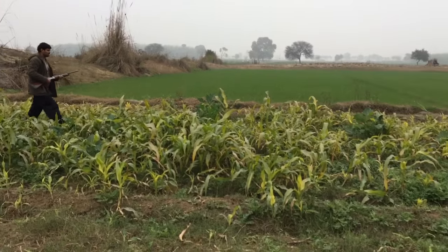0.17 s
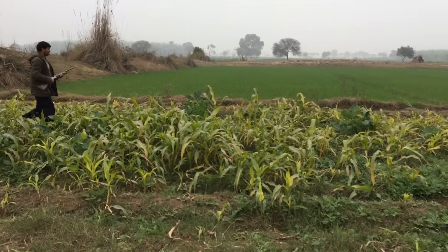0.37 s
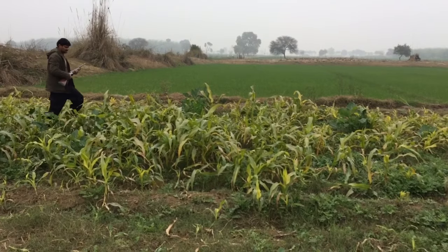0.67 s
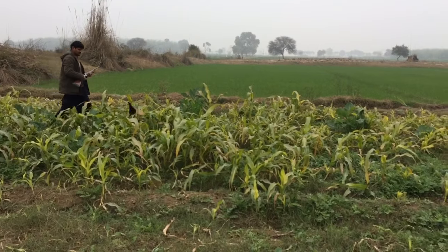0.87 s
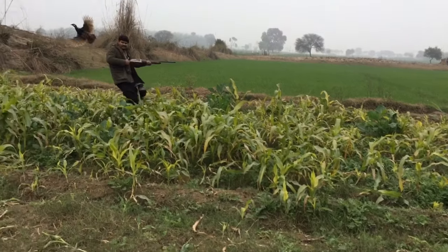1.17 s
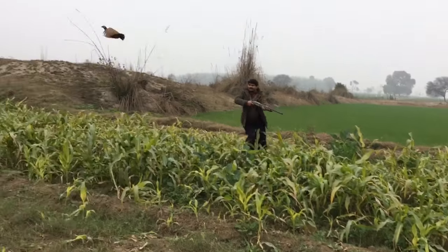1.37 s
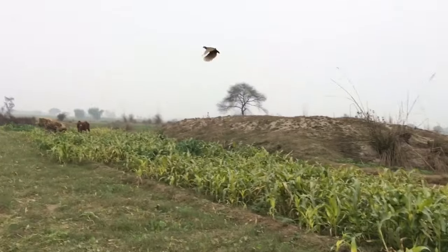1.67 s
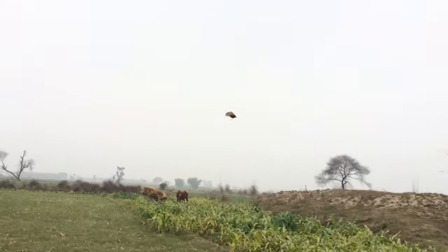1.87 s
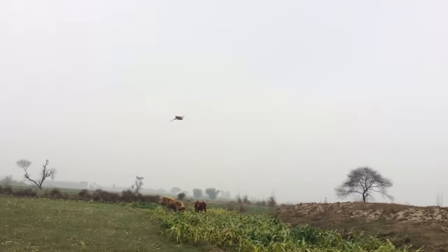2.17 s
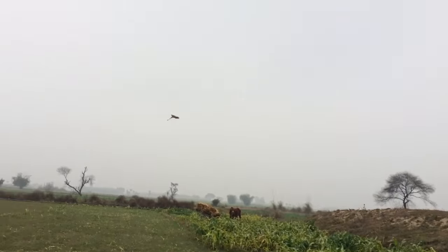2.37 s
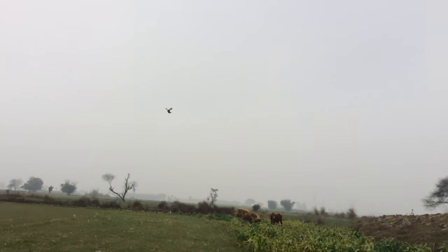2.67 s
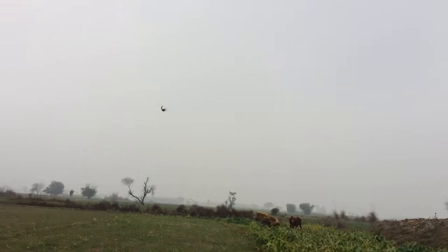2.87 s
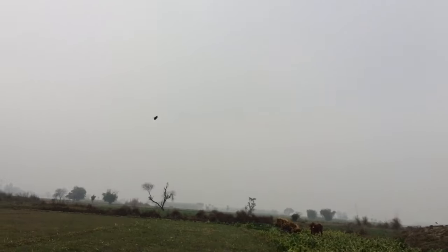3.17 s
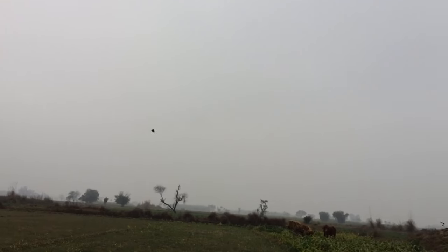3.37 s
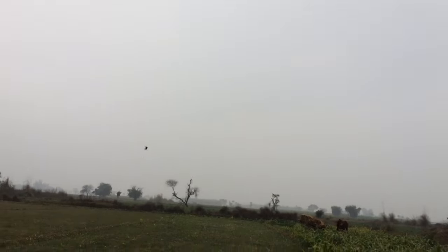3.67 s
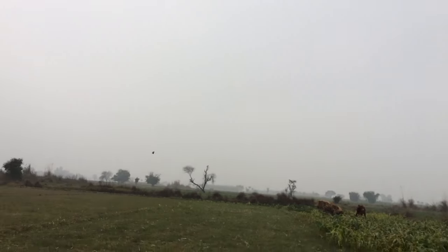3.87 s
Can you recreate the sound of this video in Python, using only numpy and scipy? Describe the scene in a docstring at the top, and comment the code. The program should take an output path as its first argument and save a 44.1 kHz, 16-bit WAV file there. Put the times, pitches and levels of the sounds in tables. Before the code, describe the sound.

A shotgun blast cracks across open farmland near the end, with thumping echoes. Before it, quiet steps and rustling leaves, then a flushed bird's rapid wingbeats fade away; one outdoor handheld microphone, mono.

```python
"""Game bird and shotgun blast

A walker in a leafy crop flushes a game bird: wingbeats are short hollow tones mixed with noise.
One shotgun blast follows: a sharp pressure pulse, noise scattered by the plants, and low thumping echoes.
Steps, scuffs and snapping stalks are short noise bursts, and the leaves rustle as noise with tiny ticks.
Behind them lie low wind, a faint hiss of air and a hoarse far bird call.
"""
import sys
import numpy as np
from scipy.fft import rfft, irfft, next_fast_len
from scipy.io import wavfile
from scipy.ndimage import map_coordinates

SR = 44100
rng = np.random.default_rng(int(sys.argv[2]) if len(sys.argv) > 2 else 0)


def wrap_up_sound(samples):
    """Save the sound to the file named by the first command line argument, as 16-bit audio."""
    columns = np.atleast_2d(samples).T
    # keep every value between -1 and 1, then stretch to whole-number steps
    tamed = np.clip(columns, -1, 1)
    steps = np.round(tamed * 32767).astype(np.int16)
    wavfile.write(sys.argv[1], SR, steps)


N = 176400  # samples: 4 seconds

# Edges of the bands in which the blast dies away: edge_hz
BAND_EDGES = [90, 600, 2100, 5000, 16000]
# Tone colour of the scattered blast: frequency_hz, level_db
BLAST_COLOUR = [(59, -53), (100, -30.5), (166, -1), (248, -8), (275, -5.5), (355, -9.5), (438, 4.5),
                (564, -6), (682, -6), (861, -9.5), (1110, -9), (1210, -7.5), (1880, -9), (2270, -12.5),
                (2630, -10), (4960, -15.5), (5630, -15), (14500, -23.5), (15500, -34.5)]
# Fading of the scatter, one row per band:
# level_db, attack_s, hold_s, decay_db_per_s, tail_level_db, tail_decay_db_per_s
SCATTER_BANDS = [(-21, .002, 0.034, 85, -58.5, 35), (-12.5, 0.0011, 0.023, 200.5, -51, 48.5),
                 (-16, .001, 0.011, 205.5, -53, 48), (-15.5, 0.0003, 0.016, 201, -58.5, 45)]
# Tone colour of the swell ahead of the crack: frequency_hz, level_db
LEAD_COLOUR = [(15, -44), (25, 1), (129, -10), (431, -6.5), (1190, -21), (1550, -9), (2280, -30),
               (2900, -4), (3700, -45.5), (8000, -49.5), (10400, -66), (17600, -120)]
# Sine tones layered under the blast: pitch_hz, level_db (before BLAST_TONES_DB)
BLAST_TONES = [(446.8, -29.5), (667.5, -35), (748.3, -34), (909.8, -34.5), (1130, -36.5), (1287, -33.5),
               (1378, -34), (1540, -36), (1750, -32.5), (1820, -33), (1873, -37.5)]
# Echoes off banks and tree lines: start_s, level_db, rise_s, pitch_hz
ECHO_THUMPS = [(3.006, -19.5, .005, 210), (3.037, -20, 0.0025, 350), (3.069, -22.5, 0.005, 414),
               (3.078, -19.5, 0.0043, 315), (3.13, -27.5, 0.0045, 198), (3.175, -20, 0.0071, 188),
               (3.217, -26.5, 0.0073, 190), (3.231, -31, 0.0055, 368), (3.283, -28.5, 0.0044, 267),
               (3.372, -28.5, .007, 195), (3.546, -25, 0.0046, 172), (3.626, -33.5, .005, 154),
               (3.904, -35, 0.0052, 166), (3.923, -33.5, 0.0081, 134)]
# Tone colour of the low roll: frequency_hz, level_db
ROLL_COLOUR = [(29, -58), (50, -38.5), (135, 0), (184, 6), (300, -3), (443, -10.5), (534, -39.5),
               (621, -22), (1000, -37), (1300, -73), (2200, -120), (2000, -45), (5000, -90)]
# Wingbeats: start_s, level_db (before BEAT_DB or PUSH_DB), pitch_hz (at the peak), rise_s
WINGBEATS = [(0.922, -38, 720, 0.005), (0.982, -33, 690, 0.0057), (1.045, -26.5, 600, 0.0023),
             (1.101, -31, 677, 0.0041), (1.158, -31, 657, 0.003), (1.219, -27, 592, 0.003),
             (1.276, -38.5, 827, 0.0049), (1.335, -31.5, 550, 0.0038), (1.399, -29, 700, 0.0037),
             (1.459, -40, 674, 0.0044), (1.525, -45, 605, 0.0042), (1.626, -46, 583, 0.0047),
             (1.715, -44, 538, 0.0038), (1.778, -47, 594, 0.0042), (1.842, -51, 820, 0.0039),
             (1.907, -46, 604, 0.0042), (1.971, -50, 560, 0.0036), (2.305, -55.5, 636, 0.0048),
             (2.373, -50.5, 619, 0.0029), (2.442, -57, 651, 0.0042)]
# Scuffs in the plants: peak_s, level_db, half_length_s, centre_hz, upper_edge_hz
SCUFFS = [(0.612, -52, 0.011, 2550, 12000), (0.884, -47.5, 0.013, 2970, 14000),
          (0.958, -40, 0.017, 1800, 12000), (1.025, -37, 0.0037, 1590, 12200),
          (1.041, -43, 0.0063, 1260, 6000), (1.258, -44, 0.01, 1400, 12000),
          (1.352, -46, .012, 1490, 12000), (1.402, -46, 0.021, 1800, 12000),
          (3.224, -51, 0.033, 5200, 9000), (3.312, -49.5, .015, 3200, 8100),
          (3.371, -38.5, 0.014, 2970, 7600), (3.405, -35, 0.012, 2630, 7400),
          (3.452, -49, 0.023, 2380, 6800), (3.502, -46.5, 0.0085, 2600, 6850),
          (3.593, -42.5, 0.011, 1540, 4540), (3.791, -48.5, 0.0059, 1720, 5400),
          (3.889, -58, 0.0062, 1970, 5000), (3.922, -57.5, 0.016, 1810, 4850),
          (3.965, -58, 0.017, 1630, 4430)]
# Snapping stalks and dry clicks: start_s, level_db, decay_s, centre_hz, width (over centre), upper_edge_hz
SNAPS = [(0.315, -38.5, 0.0024, 2050, 0.27, 12000), (0.675, -43, 0.0052, 1800, 0.56, 6000),
         (0.876, -53, 0.0035, 3000, 2, 14000), (1.134, -39, 0.0025, 8900, 0.96, 15000),
         (1.194, -38.5, .007, 1990, 0.37, 9000), (1.2347, -26, 0.0036, 1790, 0.37, 14000),
         (1.333, -34.5, 0.0066, 1210, .6, 6000), (1.649, -37, 0.0043, 2330, 0.61, 4960),
         (3.1086, -22, 0.0013, 2380, 0.1, 14500), (3.393, -26, 0.0027, 1540, 0.93, 5000),
         (3.408, -30, 0.0052, 1710, 0.31, 5000), (3.498, -37, .003, 2400, 0.5, 7000),
         (3.626, -41, 0.0038, 3600, 0.54, 7040), (3.779, -41, 0.0052, 1770, 0.29, 4960),
         (3.926, -49, 0.0062, 1890, 0.22, 4000), (3.959, -48, .005, 1270, 0.46, 3000)]
# Soft footfalls: start_s, level_db
FOOTFALLS = [(0.611, -40.5), (0.934, -36.5), (1.039, -35), (1.234, -30), (1.386, -41.5), (3.389, -29.5)]
# Tone colour of a footfall: frequency_hz, level_db
FOOT_COLOUR = [(25, 4), (60, -12), (160, 9.5), (300, -9), (700, -13.5), (3000, -49)]
# Rise and fall of the rustling leaves: time_s, level_db (before RUSTLE_DB)
RUSTLE_LEVEL = [(0.0, -57), (0.06, -53), (0.12, -65.5), (0.31, -61), (0.55, -66.5), (0.62, -58.5),
                (0.8, -60), (0.86, -61), (0.88, -45), (0.93, -55), (0.95, -48.5), (1.1, -54), (1.23, -50.5),
                (1.23, -37.5), (1.27, -49), (1.31, -54.5), (1.35, -43), (1.5, -56.5), (1.58, -53),
                (1.6, -56), (1.95, -57.5), (2.05, -66.5), (2.68, -78.5), (2.78, -70.5), (2.79, -82),
                (2.86, -72)]
# Tone colour of the leaves: frequency_hz, level_db
LEAF_COLOUR = [(180, -42.5), (300, -6), (500, -8), (696, -6), (835, -8), (1910, -7), (2790, -11),
               (3510, -8.5), (4570, -11), (14500, -20), (15500, -28.5)]
# Far calls: peak_s, level_db, half_length_s
FAR_CALLS = [(0.51, -60, 0.1), (2.34, -69.5, .10), (3.713, -60.5, 0.083)]
# Rise and fall of the wind: time_s, level_db (before WIND_DB)
WIND_LEVEL = [(0, -51), (.7, -48), (1.25, -45), (1.45, -53), (2.1, -51.5), (2.4, -49), (2.85, -51),
              (4, -48.5)]
# Tone colour of the wind: frequency_hz, level_db
WIND_COLOUR = [(15, -43), (25, -30), (59, -1.5), (75, 0), (132, -9.5), (238, -27), (266, -23.5),
               (350, -30.5), (460, -58), (770, -120), (900, -64)]
# Tone colour of the hiss of air: frequency_hz, level_db
AIR_COLOUR = [(120, -26), (200, 2), (315, -30.5), (352, -6.5), (392, -8.5), (430, -6.5), (812, -12.5),
              (4750, -20.5), (15500, -32.5)]

SHOT_S = 2.9063  # moment of the crack
LEAD_S, LEAD_DB, LEAD_HISS_DB = 0.023, -22.5, -38.5  # start before the crack, swell level, hiss level
SHOCK_DB, SHOCK_S = 5.5, 0.00066  # level; time until the pressure crosses zero
THUD_DB, THUD_HZ, THUD_RISE_S = -25.5, 57.4, 0.0023  # the low push of the muzzle gas
BLAST_TONES_DB, BLAST_TONES_ATTACK_S, BLAST_TONES_DB_PER_S = 4.5, 0.012, 236.5  # added level, attack, decay
ECHO_DIFFUSE = 0.27  # noise mixed into an echo
SLAP_S, SLAP_DB, SLAP_RISE_S = 3.019, -22, 0.0028  # a bright near reflection
ROLL_DB, ROLL_DB_PER_DECADE = -29, 26  # level; fall for each tenfold growth in time
ROLL_ONSET_S, ROLL_WOBBLE_DB = 0.15, -0.5
BEAT_DB, BEAT_SAG, BEAT_ROUGH = -2, 0.072, 0.51  # added level, starting pitch rise (share), noise mixed in
PUSH_DB, PUSH_HZ, PUSH_LAG_S = -8.5, 162.5, 0.0115  # the push of air after each beat
SCUFF_WIDTH, SCUFF_GRAIN = 0.87, 0.28  # width over centre; depth of the graininess
SNAP_CRACK = 0.041  # broadband part of a snap
FOOT_RISE_S = 0.0054
RUSTLE_DB, CRINKLE_DB, CRINKLES_PER_S = 2, -6, 260  # added level, crinkle share, average tick rate
CALL_HZ, CALL_WIDTH = 1915, 0.14  # pitch; half the width of its hoarseness over the pitch
CALL_TONE, CALL_ARCH = 0.6, 0.0062  # clean tone mixed in; share the pitch falls at one half length
WIND_DB, WIND_WOBBLE_DB = -1.5, 3  # added level; size of the wavering
AIR_DB = -69
PEAK_LIMIT, TOP_HZ = 0.88, 15400  # largest rounded level (full scale is 1); upper band limit
MIC_DIP_HZ, MIC_DIP_WIDTH, MIC_DIP_DEPTH = 2640, 0.23, 0.21  # centre, width over centre, depth (share)


def amp(db):
    """Turn decibels into a plain gain."""
    return 10 ** (np.asarray(db) / 20)


def unit(x):
    """Scale a sound to an rms (average strength) of 1."""
    return x / np.sqrt(np.mean(x ** 2) + 1e-20)


def clock():
    """Give the time of each sample in seconds."""
    return np.arange(N) / SR


def curve(rows):
    """Join (time_s, value) points with straight lines."""
    return np.interp(clock(), *np.transpose(rows))


def wobble(rate):
    """Make a smooth random curve with this many random points a second."""
    return map_coordinates(rng.standard_normal(8192), [clock() * rate], mode="wrap")


def filtered(x, response):
    """Weaken or strengthen each frequency of x by the given response."""
    size = next_fast_len(N + 8192)
    spectrum = rfft(x, size) * response(np.fft.rfftfreq(size, 1 / SR))
    return irfft(spectrum, size)[:N]


def shape(points):
    """Make a response through (frequency_hz, level_db) points, joined along a log scale."""
    f, db = np.transpose(points)
    return lambda hz: amp(np.interp(np.log(hz + 1), np.log(f + 1), db))


def resonance(centre, width):
    """Make a response that favours pitches near the centre; width is relative to it."""
    return lambda f: 1j * f * centre * width / (centre ** 2 - f ** 2 + 1j * f * centre * width)


def noise(response):
    """Make coloured noise of rms 1."""
    return unit(filtered(rng.standard_normal(N), response))


def swell(peak_s, half):
    """Make a bell-shaped envelope around its peak."""
    return np.exp(-0.5 * np.minimum(((clock() - peak_s) / half) ** 2, 200))


def puff(start, rise):
    """Make an envelope that begins at start, peaks after rise and dies away."""
    u = np.clip((clock() - start) / rise, 0, 60)
    return u * np.exp(1 - u)


def burst(envelope, response):
    """Put coloured noise under a short envelope and give it the envelope's own energy."""
    x = envelope * noise(response)
    return x * np.linalg.norm(envelope) / (np.linalg.norm(x) + 1e-20)


def shot():
    """A short swell, the shock's pressure pulse, then dense scatter from the field that dies band by band."""
    t = clock() - SHOT_S
    age = np.maximum(t, 0)
    lead = amp(LEAD_DB) * swell(SHOT_S - 0.006, 0.0068) * noise(shape(LEAD_COLOUR))
    hiss = amp(LEAD_HISS_DB) * (t > -LEAD_S) * (t < 0) * noise(shape(BLAST_COLOUR))
    u = np.minimum(age / SHOCK_S, 20)
    shock = -amp(SHOCK_DB) * (t > 0) * (1 - u) * np.exp(-u)
    out = lead + hiss + shock
    for lo, hi, row in zip(BAND_EDGES, BAND_EDGES[1:], SCATTER_BANDS):
        db, attack, hold, decay, tail_db, tail_decay = row
        early = amp(db - decay * np.maximum(age - hold, 0))
        tail = amp(tail_db - tail_decay * age)
        onset = 1 - np.exp(-age / attack)
        flicker = amp(2.3 * wobble(170))
        band = noise(lambda f: shape(BLAST_COLOUR)(f) * (f > lo) * (f < hi))
        out += (early + tail) * onset * flicker * band
    return out


def shot_body():
    """A low push of muzzle gas just ahead of the crack, and fading sine tones that thicken the blast noise."""
    age = np.maximum(clock() - SHOT_S, 0)
    tones = np.zeros(N)
    for hz, db in BLAST_TONES:
        tone = np.sin(2 * np.pi * (hz * age + rng.random()))
        tones += amp(db - BLAST_TONES_DB_PER_S * age) * tone
    tones *= 1 - np.exp(-age / BLAST_TONES_ATTACK_S)
    start = SHOT_S - LEAD_S
    thud = np.sin(2 * np.pi * THUD_HZ * (clock() - start)) * puff(start, THUD_RISE_S)
    return amp(THUD_DB) * thud + amp(BLAST_TONES_DB) * tones


def echoes():
    """Returning sound makes thumps of a few cycles and one bright slap, over a low roll that fades."""
    t = clock()
    age = np.maximum(t - SHOT_S, 0) / ROLL_ONSET_S
    fall_db = ROLL_DB_PER_DECADE * np.log10(np.maximum(age, 1))
    roll_db = ROLL_DB - fall_db + ROLL_WOBBLE_DB * wobble(45)
    out = np.minimum(age, 1) * amp(roll_db) * noise(shape(ROLL_COLOUR))
    for s, db, rise, hz in ECHO_THUMPS:
        thump = np.sin(2 * np.pi * hz * (t - s)) * puff(s, rise) ** 2
        diffuse = burst(puff(s, rise), lambda f: resonance(hz, 1.3)(f) ** 3)
        out += amp(db) * (thump + ECHO_DIFFUSE * diffuse)
    slap = puff(SLAP_S, SLAP_RISE_S) * noise(resonance(6200, 0.62))
    return out + amp(SLAP_DB) * slap


def wings():
    """Each downstroke gives a short hollow whup that sags in pitch, then a push of air."""
    out, t = np.zeros(N), clock()
    flutter = noise(lambda f: resonance(760, 1.3)(f) ** 2)
    for s, db, hz, rise in WINGBEATS:
        u = np.clip((t - s) / rise, 0, 20)
        sag = 1 + BEAT_SAG * (1 - u / 2)  # the pitch slides down through hz at the peak
        tone = np.sin(2 * np.pi * hz * (t - s) * sag)
        whup = (tone + BEAT_ROUGH * flutter) * puff(s, rise) ** 2
        push = np.sin(2 * np.pi * PUSH_HZ * (t - s)) * puff(s + PUSH_LAG_S, 0.0045) ** 2
        out += amp(db) * (amp(BEAT_DB) * whup + amp(PUSH_DB) * push)
    return out


def scuffs():
    """Plants brushed aside give soft swells of grainy noise."""
    out = np.zeros(N)
    grain = unit(np.exp(SCUFF_GRAIN * wobble(600)))
    for s, db, half, hz, edge in SCUFFS:
        brush = noise(lambda f: resonance(hz, SCUFF_WIDTH)(f) / np.sqrt(1 + (f / edge) ** 6))
        out += amp(db) * swell(s, half) * grain * brush
    return out


def snaps():
    """A snapping stalk starts at once and dies fast: noise around one pitch plus a broadband crack."""
    out, t = np.zeros(N), clock()
    for s, db, decay, hz, width, edge in SNAPS:
        def colour(f):
            """Sum the pitched part and the crack, then soften the top."""
            return (resonance(hz, 2 * width)(f) ** 3 + SNAP_CRACK) / np.sqrt(1 + (f / edge) ** 6)

        fade = (t >= s) * np.exp(-np.clip((t - s) / decay, 0, 20))
        out += amp(db) * burst(fade, colour)
    return out


def footfalls():
    """The dull weight of each foot is a short puff of mostly low noise."""
    return sum(amp(db) * burst(puff(s, FOOT_RISE_S), shape(FOOT_COLOUR)) for s, db in FOOTFALLS)


def leaves():
    """Leaves slide over each other as noise that rises and falls, with tiny random crinkles on top."""
    ticks = (rng.random(N) < CRINKLES_PER_S / SR) * rng.uniform(-1, 1, N)
    crinkle = unit(filtered(ticks, shape(LEAF_COLOUR)))
    level = amp(curve(RUSTLE_LEVEL) + RUSTLE_DB + 1.5 * wobble(45))
    return level * (noise(shape(LEAF_COLOUR)) + amp(CRINKLE_DB) * crinkle)


def far_calls():
    """A far bird mixes a clean tone and hoarse noise; the tone's pitch arches up and down."""
    out = np.zeros(N)
    hoarse = noise(lambda f: resonance(CALL_HZ, 2 * CALL_WIDTH)(f) ** 2)
    for s, db, half in FAR_CALLS:
        hz = CALL_HZ * (1 - CALL_ARCH * np.minimum(((clock() - s) / half) ** 2, 10))
        tone = np.sin(2 * np.pi * np.cumsum(hz) / SR)
        out += amp(db) * swell(s, half) * (hoarse + CALL_TONE * tone)
    return out


def wind():
    """Light wind is a low rumble of noise whose level wavers."""
    waver_db = WIND_WOBBLE_DB * wobble(18) + 2 * wobble(8.7)
    return amp(curve(WIND_LEVEL) + WIND_DB + waver_db) * noise(shape(WIND_COLOUR))


def air():
    """Open air is a faint, steady hiss of noise."""
    return amp(AIR_DB) * noise(shape(AIR_COLOUR))


def scene():
    """Add up everything at one microphone."""
    blast = shot() + shot_body() + echoes()
    walker = scuffs() + snaps() + footfalls() + leaves()
    background = far_calls() + wind() + air()
    return (blast + wings() + walker + background)[None]


def record(dry):
    """Round off loud peaks, dip a little in the upper mids and cut steeply above the band limit."""
    rounded = dry[0] / (1 + np.abs(dry[0] / PEAK_LIMIT) ** 6) ** (1 / 6)

    def response(f):
        """Combine the microphone's shallow dip with the steep upper limit."""
        dip = 1 - MIC_DIP_DEPTH * resonance(MIC_DIP_HZ, MIC_DIP_WIDTH)(f)
        return dip / np.sqrt(1 + (f / TOP_HZ) ** 200)

    return filtered(rounded, response)[None]


dry = scene()
out = record(dry)
wrap_up_sound(out)
```